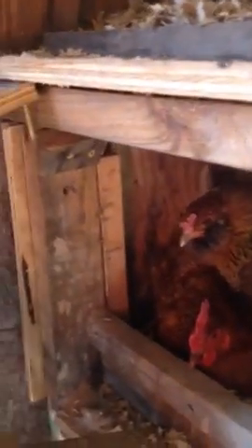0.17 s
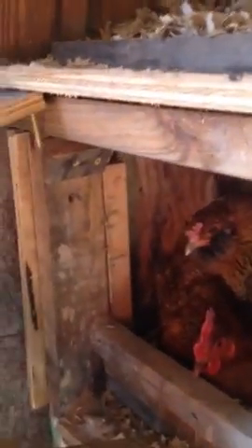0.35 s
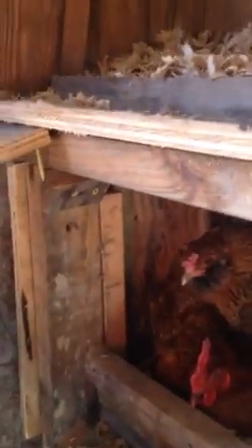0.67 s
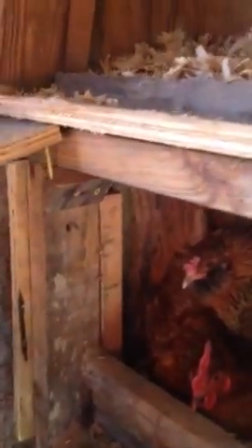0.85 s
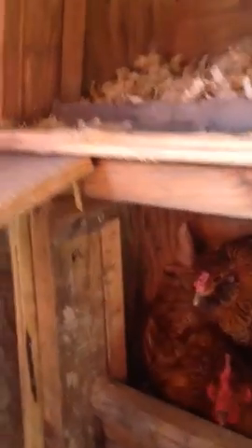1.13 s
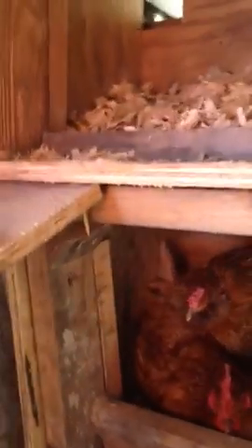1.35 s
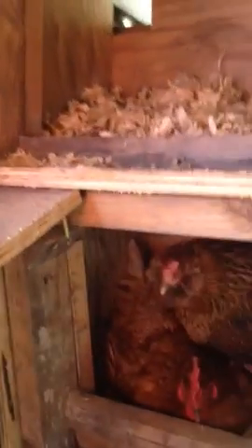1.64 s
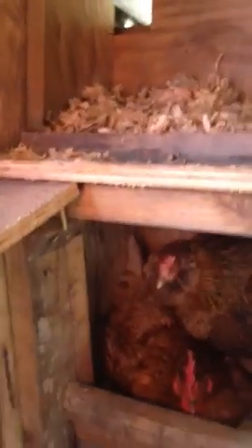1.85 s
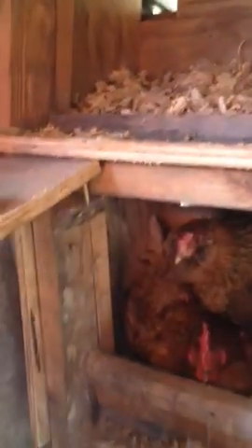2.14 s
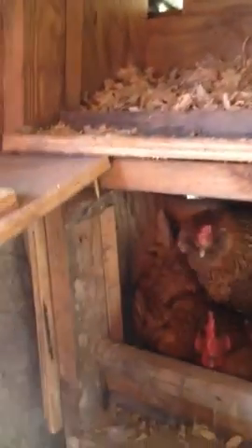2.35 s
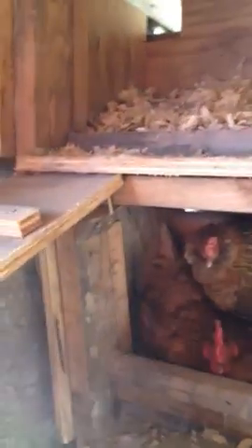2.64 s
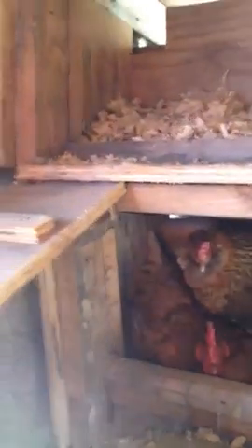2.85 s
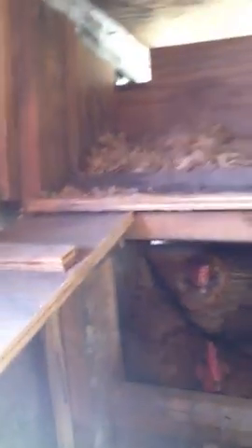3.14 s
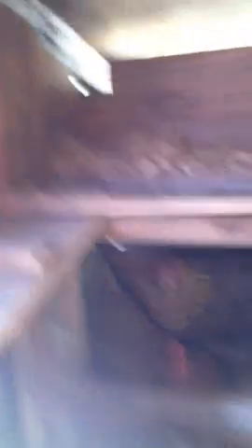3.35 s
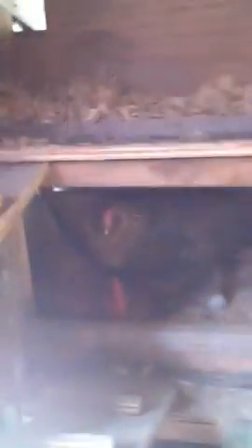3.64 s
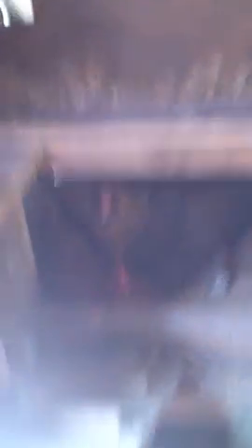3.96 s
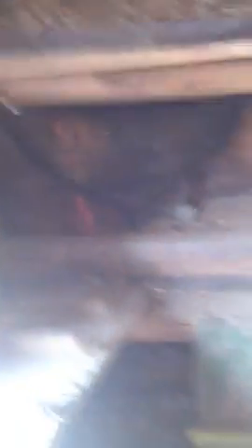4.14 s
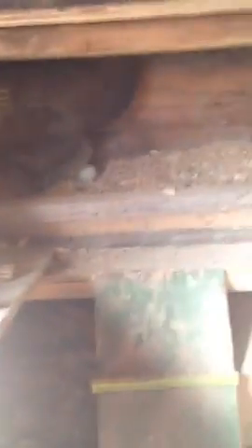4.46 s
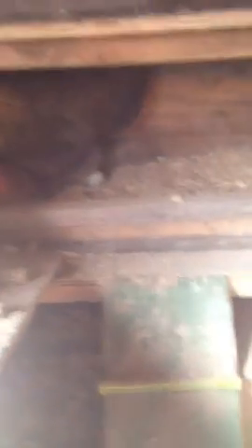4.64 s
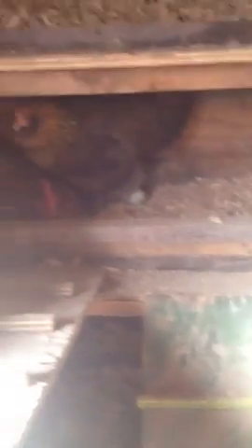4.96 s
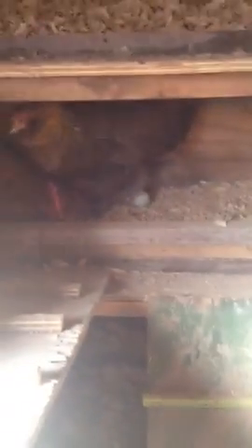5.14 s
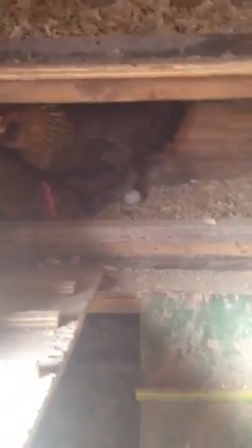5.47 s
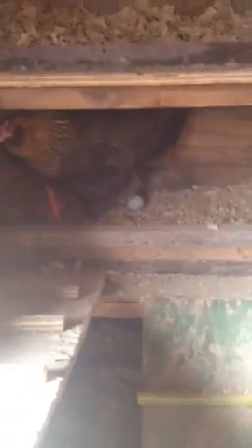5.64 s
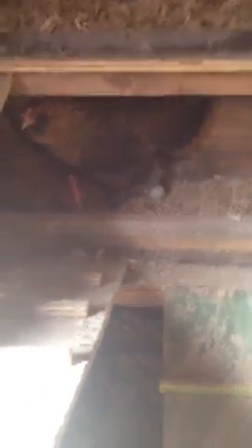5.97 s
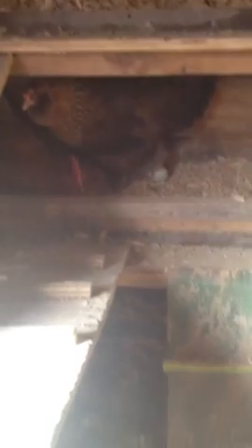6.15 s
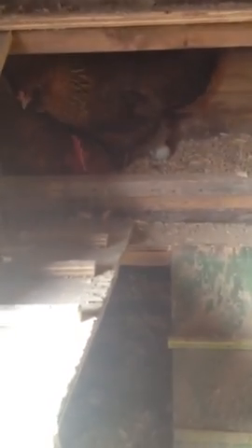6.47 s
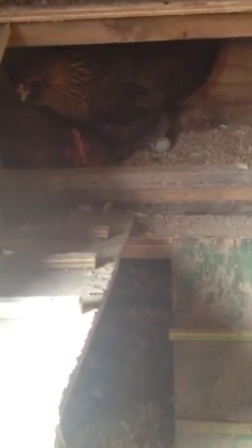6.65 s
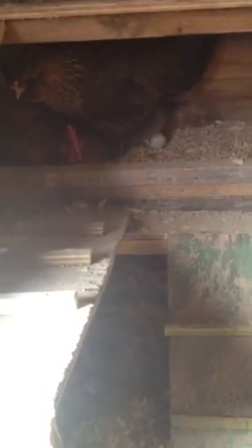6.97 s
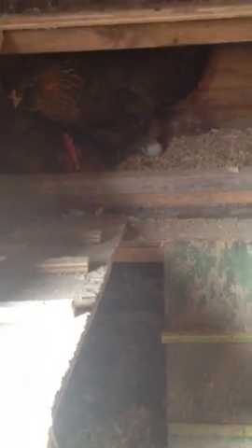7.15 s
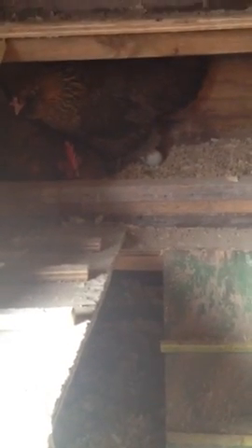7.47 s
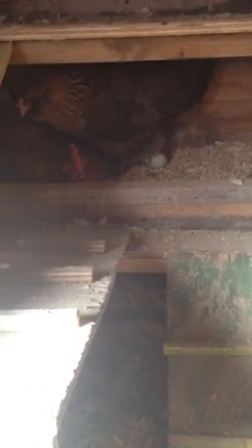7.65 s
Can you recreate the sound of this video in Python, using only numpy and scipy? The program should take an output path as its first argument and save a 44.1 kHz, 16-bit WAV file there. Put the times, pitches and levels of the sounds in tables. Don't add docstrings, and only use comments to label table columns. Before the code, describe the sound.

A hen in a wooden nest box clucks, squawks harshly, knocks and scrapes the boards, clucks steadily again, then squawks once more.

```python
import sys
import numpy as np
from scipy import signal
from scipy.io import wavfile
from scipy.ndimage import uniform_filter1d

SR = 44100
rng = np.random.default_rng(int(sys.argv[2]) if len(sys.argv) > 2 else 0)


def materialize(psi):
    bounded = np.clip(np.atleast_2d(psi).T, -1, 1)
    quanta = np.round(bounded * 32767).astype(np.int16)
    wavfile.write(sys.argv[1], SR, quanta)


def ratio_of_db(decibels):
    return 10 ** (np.asarray(decibels, float) / 20)


N = 344421

# [f/Hz, density/dB]
RUMBLE_SPECTRUM = [(18, -73), (30, -52.5), (53, -36.5), (83, -9), (177, 3.5), (439, -3), (590, -22),
                   (794, -20.5), (955, -28.5), (2500, -49), (3250, -65.5), (5500, -120)]
# [t/s, level/dB]
RUMBLE_SWELLS = [(0.0, -68), (1.1, -69), (1.72, -58.5), (2.05, -63), (2.7, -58.5), (3.15, -58), (3.87, -51),
                 (4.2, -56), (4.55, -52), (5.1, -56), (5.55, -53), (5.8, -56.5), (7.81, -58)]
# [f/Hz, width/Hz, level/dB]
ENGINES = [(100, 25, 4), (167.6, 8.3, 4), (208, 8.3, 3.5), (285, 30, 4.5)]
# [f/Hz, density/dB]
HISS_SPECTRUM = [(18, -57.5), (30, -31), (53, -24.5), (97, 1), (133, -13), (168, -2.5), (197, -13),
                 (479, -9), (546, 1), (656, -4), (767, -2.5), (852, -6.5), (2550, -14), (15500, -26)]
# [t/s, length/s, f/Hz, level/dB]
SONGBIRD = (7.615, .13, 3640, -69)

# [peak t/s, level/dB, rise over the last 10 dB/s, fall by 10 dB/s]
SHUFFLES = [(.1, -77, .2, .25), (.7, -78, .25, .25), (.976, -67, .05, 0.22), (1.208, -67, 0.15, 0.12),
            (1.322, -66, 0.11, .07), (1.835, -62, .03, .015), (2.0, -72, 0.2, 0.13),
            (2.326, -63, .008, .012), (2.436, -56, .002, .005), (2.67, -70, .02, .03), (2.95, -75, .3, .3),
            (3.635, -51, .06, 0.0062), (3.758, -48, 0.0174, 0.0167), (3.8, -64, 0.05, .08),
            (3.994, -63, 0.04, 0.1), (4.27, -71, .02, .06), (4.55, -74, .15, .35),
            (5.116, -68, 0.03, -0.05)]
SCRATCHES = [(1.078, -60, .012, .02), (2.162, -58.5, .02, .012), (2.508, -63.5, 0.014, .02),
             (3.748, -33.5, .008, .006), (4.055, -48, 0.046, .12), (4.228, -42, .06, .022),
             (5.08, -61, 0.028, .03)]
FLUFFS = [(.226, -72, .12, 0.086), (2.084, -64, .03, .012), (2.3, -71, .15, .15),
          (3.252, -65, 0.024, 0.046), (3.43, -59, 0.037, .1), (3.522, -49.5, 0.069, .04),
          (3.72, -64, .035, .02), (3.768, -52, .01, .025), (3.82, -62, 0.025, 0.037),
          (4.3, -63, 0.042, .06), (4.46, -69, .06, 0.05), (6.135, -64, .03, .06)]
# [crisp top/dB, feathers/dB, dull body/dB]
RUSTLE_MIX = [(1, -0.5, 5.5), (-16, -3.5, -9.5), (-11, 7, 8)]
# [f/Hz, level/dB]
CRISP = [(4000, -24), (5600, -5), (6800, 0.5), (8500, -6.5), (11000, -10), (15000, -10)]

# [t/s, level/dB, f/Hz, t60/s]
THUDS = [(.232, -49.5, 392, .05), (0.969, -48, 476, .03), (2.151, -45.5, 1480, .06),
         (2.204, -39.5, 490, .04), (2.32, -44.5, 1550, 0.046), (2.436, -39, 690, .03),
         (2.59, -41, 440, .05), (2.663, -39.5, 1693, 0.052), (2.777, -54, 264, .04),
         (3.378, -35.5, 474, .04), (3.421, -39, 720, .03), (3.515, -32.5, 780, .03), (3.528, -31, 476, .05),
         (3.606, -35, 700, .04), (3.645, -19, 700, 0.014), (3.7463, -7, 606, 0.0081),
         (3.876, -38.5, 273, .05), (3.932, -16.5, 590, 0.022), (4.225, -31.5, 598, 0.032),
         (4.612, -50, 2220, .06)]
# [t/s, level/dB, f/Hz]
TICKS = [(.232, -48, 1500), (0.969, -44.5, 2500), (1.003, -41, 2100), (1.2, -46, 2600),
         (2.151, -46.5, 2500), (2.163, -50, 3670), (2.204, -50, 1800), (2.32, -47, 3000),
         (2.436, -37, 2800), (2.663, -55, 3000), (3.378, -49.5, 1790), (3.421, -34, 7500),
         (3.515, -27, 2500), (3.528, -33, 1500), (3.606, -38.5, 1500), (3.645, -32.5, 2136),
         (3.701, -44, 4500), (3.7462, -11, 2805), (3.876, -44, 1900), (3.932, -23, 2920),
         (4.021, -30, 2770), (4.225, -45.5, 3200), (6.763, -54, 9500), (7.155, -58, 8000),
         (7.261, -49, 9000)]
PLANK = [(.84, .35), (1, .7), (1.14, .4)]
# [f/Hz, level/dB, t60/s]
BOX = [(760, -4, .1), (1000, -2, .12), (1140, 0, .12)]

# [t/s, effort level/dB, length/s,
# first pitch f/Hz, last pitch f/Hz]
CLUCKS = [(1.15, -38, 0.021, 286, 337), (1.338, -38, 0.014, 398.3, 428), (1.874, -26, 0.03, 286.4, 368),
          (1.89, -17.5, .024, 425, 513.5), (2.059, -26.5, 0.036, 309, 384.5),
          (2.251, -29.5, 0.032, 350, 386.6), (2.496, -29.5, 0.016, 403, 426), (2.506, -24, 0.014, 456, 482),
          (3.714, -32, 0.023, 357, 356), (3.921, -28, 0.033, 370.5, 369.7),
          (4.136, -27.5, 0.033, 379, 376.3), (4.333, -22.5, 0.0234, 321, 373),
          (4.521, -23, 0.028, 282, 377), (4.719, -25, .029, 292, 372), (4.91, -25, 0.033, 310, 375.3),
          (5.101, -25, 0.03, 278, 368.6)]
# [f/Hz, level/dB]
BEAK_AJAR = [(150, -12.5), (450, -8.5), (760, -1), (1000, 3), (1500, -16.5), (2100, -11), (2650, -35.5),
             (3100, -20), (3700, -46.5), (5200, -37), (6800, -40.5), (8200, -46), (9000, -52), (15000, -55)]
# [f/Hz, level/dB]
BEAK_SHUT = [(150, -34), (360, -11.5), (760, -7), (1080, 0.5), (1450, -17.5), (1850, -18.5), (2150, -12.5),
             (2650, -37.5), (3500, -44), (4900, -44.5), (8000, -56.5), (15000, -64.5)]
# [f/Hz, width/Hz, level/dB]
PIPE_SHUT = [(3650, 800, -10.5), (4897, 500, 5), (7000, 1400, -11.5), (8100, 450, 10.5)]

# [t/s, effort level/dB, pitch f/Hz]
SQUAWKS = [
    [(1.443, -19.5, 474.3), (1.474, -14.5, 589.6), (1.491, -18, 626), (1.509, -18, 590.2),
     (1.522, -19, 490.3), (1.556, -30, 504.7), (1.584, -14.5, 615.3), (1.601, -13.5, 667),
     (1.75, -15, 670.6)],
    [(5.262, -16, 495), (5.289, -19, 558), (5.298, -15.5, 648), (5.363, -15.5, 633.7), (5.383, -17, 686.3),
     (5.415, -13.5, 662), (5.444, -18, 525.3), (5.47, -14.5, 711.6), (5.608, -16.5, 750)],
]
# [t/s, pitch drop 0-1, second membrane 0-1, roughness after 0-1, at the end 0-1]
BREAKS = [
    (1.603, .063, 0, .1, .13),
    (5.47, .155, 1, .26, .42),
]
# [from t/s, pairs 0-1, fours 0-1]
PAIRING = [
    (1.612, .7, .18),
    (5.352, .25, 0),
]
# [clear level/dB, broken level/dB]
SQUAWK_TREBLE = [(-2, 1.49), (2, -1.5)]
# [f/Hz, level/dB]
BEAK_OUT = [(150, -46), (310, -20.5), (620, -5.5), (1280, 3), (1650, -17), (2220, 0), (2620, -27.5),
            (3020, -9), (3500, -15), (4700, -30.5), (6200, -22.5), (8700, -29), (10000, -32.5),
            (15000, -40.5)]
# [f/Hz, level/dB]
BEAK_IN = [(150, -50), (310, -18.5), (640, -9), (1100, 4.5), (1500, -7), (1780, -20.5), (2100, -10),
           (2800, -13.5), (3300, -23.5), (4350, -24.5), (7200, -36.5), (7900, -26), (9000, -40.5),
           (12000, -36.5)]
# [f/Hz, width/Hz, level/dB]
PIPE_OUT = [(4020, 590, -27), (6140, 170, 6), (7000, 270, -9), (8650, 610, -12.5), (9300, 280, -11),
            (11300, 600, -33), (11950, 150, -14), (14050, 300, -13)]
PIPE_IN = [(3577, 720, -36), (5350, 140, 0), (6100, 210, 7.5), (6700, 250, -8.5), (9950, 600, -27.5),
           (11330, 150, -18.5), (12460, 500, -9.5), (14900, 600, -21.5)]


def evened(x):
    return x / np.sqrt(np.mean(x ** 2) + 1e-20)


def read(points, hz):
    f, value = np.transpose(points)
    return np.interp(np.log(hz + 1), np.log(f + 1), value)


def add(mix, s, sound):
    part = mix[round(s * SR):][:len(sound)]
    part += sound[:len(part)]


def colour(x, points, peaks=()):
    hz = abs(np.fft.fftfreq(4096, 1 / SR))
    db = read(points, hz)
    for f, width, top_db in peaks:
        db = db + top_db * np.exp(-(2 * (hz - f) / width) ** 2)
    taps = np.fft.ifft(np.exp(np.conj(signal.hilbert(np.log(ratio_of_db(db)))))).real[:2048]
    return signal.oaconvolve(x, taps)[:len(x)]


def band(x, lo_hz, hi_hz):
    return evened(signal.sosfilt(signal.butter(3, [lo_hz, hi_hz], "band", fs=SR, output="sos"), x))


def background():
    t = np.arange(N) / SR
    lumps = uniform_filter1d(rng.standard_normal(N), size=2000)
    lumps = evened(uniform_filter1d(lumps, size=2000))
    rumble_db = np.interp(t, *np.transpose(RUMBLE_SWELLS)) + 1.0 + 2.4 * lumps
    rumble = ratio_of_db(rumble_db) * evened(colour(rng.standard_normal(N), RUMBLE_SPECTRUM, ENGINES))
    hiss = evened(colour(rng.standard_normal(N), HISS_SPECTRUM, [(13400, 2600, 6.1)]))
    out = rumble + ratio_of_db(-65) * hiss
    s, length, hz, db = SONGBIRD
    u = np.arange(0, length, 1 / SR)
    add(out, s, ratio_of_db(db) * np.sin(np.pi * u / length) * np.sin(2 * np.pi * hz * u))
    return out


def shavings():
    crackle = ratio_of_db(4.3 * np.minimum(rng.exponential(1, N), 5)) * (rng.random(N) < .03)
    grains = rng.standard_normal(N) * (1 + crackle)
    scrape = band(grains, 2610, 4100)
    top = evened(colour(grains, CRISP))
    feathers = band(grains, 1500, 2500)
    body = band(grains, 255, 1040)
    out, t = np.zeros(N), np.arange(0, N / SR, .001)
    for rows, (top_db, feathers_db, body_db) in zip((SHUFFLES, SCRATCHES, FLUFFS), RUSTLE_MIX):
        swells = [ratio_of_db(db - 10 * np.maximum((s - t) / rise, (t - s) / fall) ** 2)
                  for s, db, rise, fall in rows]
        swell = np.interp(np.arange(N) / SR, t, np.max(swells, axis=0))
        rustle = scrape + ratio_of_db(top_db) * top + ratio_of_db(feathers_db) * feathers + ratio_of_db(body_db) * body
        out += swell * rustle
    return out


def knocks():
    out, t = np.zeros(N), np.arange(SR // 8) / SR
    for s, db, hz, t60 in THUDS:
        thud = ratio_of_db(db - 60 * t / t60) * (1 - np.exp(-t / 0.00036))
        add(out, s, thud * sum(np.sin(2 * np.pi * hz * near * t) * share for near, share in PLANK))
    for s, db, hz in TICKS:
        tick = np.exp(-t * hz * 1.41) * np.sin(2 * np.pi * hz * t) * (1 - np.exp(-t * hz * 3))
        add(out, s, -ratio_of_db(db + 13) * tick)
    return out


def coop(x):
    t = np.arange(SR // 2) / SR
    modes = sum(ratio_of_db(db - 60 * t / t60) * np.sin(2 * np.pi * hz * t) for hz, db, t60 in BOX)
    modes *= ratio_of_db(-29) / np.linalg.norm(modes)
    taps = rng.choice([-1., 1.], len(t)) * (rng.random(len(t)) < .05) * (t > .003)
    wood = taps * ratio_of_db(-60 * t / 0.11)
    shed = ratio_of_db(-57.5) * band(taps, 1300, 2600) * ratio_of_db(-60 * t / 0.53)
    tail = wood + shed
    return signal.oaconvolve(x, modes + ratio_of_db(-6.5) * tail / np.linalg.norm(tail))[:N]


def voice(hz, pairing, rough, treble_db, beak, pipe=(), share=0., second_hz=0., fours=0.):
    wobble, air, size = rng.standard_normal((3, SR // 2))[:, :len(hz)]
    jitter = .2 * rough * evened(uniform_filter1d(wobble, size=90))
    turns = np.cumsum(hz * (1 + jitter)) / SR
    phase = [np.pi * k * turns + .06 * k ** 2 for k in range(56)]
    lines = [np.sin(p) * (k * hz < 31200) / 4 for k, p in enumerate(phase)]
    pulses = sum(lines[2::2]) + pairing * sum(lines[1::2])
    pulses *= 1 + fours * np.sin(np.pi * turns / 2)
    other = 2 * np.pi * np.cumsum(second_hz + 0 * hz) / SR
    second = sum(np.sin(p + other) for p in phase[:40:2]) / 4
    pulses += share * (second - .6 * pulses)
    pulses *= 1 + .9 * rough * size[np.round(turns).astype(int)]
    puffs = evened((0.63 + np.exp(-(turns % 1) / .3)) * air)
    source = pulses + .7 * rough * puffs
    split = signal.butter(4, 3800, "high", fs=SR, output="sos")
    source += signal.sosfiltfilt(split, ratio_of_db(treble_db) * (source + .4 * puffs) - source)
    return evened(colour(source, beak, pipe))


def clucks():
    out = np.zeros(N)
    for s, db, length, first_hz, last_hz in CLUCKS:
        u = np.arange(0, 1, 1 / (length * SR))
        hz = first_hz + (last_hz - first_hz) * np.sin(np.pi / 2 * np.minimum(1.3 * u, 1))
        shape = np.sin(np.pi * u ** (0.76 * (last_hz / first_hz) ** 1.9))
        shape **= 1.35
        ajar = s < 3
        beak = BEAK_AJAR if ajar else BEAK_SHUT
        rough = .1 + .02 * (-22 - db) + .14 * ajar
        treble_db = 5 - 14 * (1 - shape) + .5 * (db + 25.5)
        add(out, s, ratio_of_db(db - 3) * shape * voice(hz, .05, rough, treble_db, beak, PIPE_SHUT))
    return out


def squawks():
    attack_s, break_s, release_s = .013, .018, .042
    clear_pairing, clear_rough = .04, .06
    out = np.zeros(N)
    for rows, breaking, pairing, treble, beak, pipe in zip(
            SQUAWKS, BREAKS, PAIRING, SQUAWK_TREBLE, (BEAK_OUT, BEAK_IN), (PIPE_OUT, PIPE_IN)):
        at, drop, share, rough, tired = breaking
        pair_s, pairs, fours = pairing
        clear_db, broken_db = treble
        s, *columns = np.transpose(rows)
        t = np.arange(s[0], s[-1] + release_s, 1 / SR)
        db, hz = (uniform_filter1d(np.interp(t, s, c), size=250) for c in columns)
        attack = np.maximum(1 - (t - s[0]) / attack_s, 0)
        late = np.maximum(t - at, 0)
        broken = np.minimum(late / break_s, 1)
        paired = np.clip((t - pair_s) / break_s, 0, 1)
        release = np.maximum(t - s[-1], 0) / release_s
        second_hz = 828 + 500 * late + 45.05 * np.sin(2 * np.pi * 18 * (late - .015))
        second_share = share * broken * np.exp(-(late / .13) ** 2)
        pitch = hz * (1 - drop * broken) * (1 - .2 * release)
        pair_depth = clear_pairing + (pairs - clear_pairing) * paired
        rasp = clear_rough + (rough - clear_rough) * broken + (tired - rough) * late / (s[-1] - at)
        rasp = rasp + .25 * attack + .65 * np.sqrt(release)
        treble_db = clear_db + (broken_db - clear_db) * broken
        treble_db = treble_db + .4 * (-16 - db) - 10 * release
        sound = voice(pitch, pair_depth, rasp, treble_db, beak, pipe,
                      second_share, second_hz, fours * paired)
        db = db - 18 * attack - 30 * release ** 1.5
        add(out, s[0], ratio_of_db(db) * signal.windows.tukey(len(t), .03) * sound)
    return out


def scene():
    no_bass = signal.butter(2, 130, "high", fs=SR, output="sos")
    bird, hits = signal.sosfilt(no_bass, [clucks() + squawks(), knocks()])
    return (bird + hits + coop(bird + .5 * hits) + shavings() + background())[None]


def band_limit(x):
    return signal.sosfilt(signal.butter(12, 15700, fs=SR, output="sos"), x)


def record(dry):
    cut = signal.sosfilt(signal.butter(2, 24, "high", fs=SR, output="sos"), dry)
    edge = signal.firwin(511, 15400, window=("kaiser", 9), fs=SR)
    return band_limit(signal.oaconvolve(cut, edge[None], "same"))


dry = scene()
out = record(dry)
materialize(out)
```